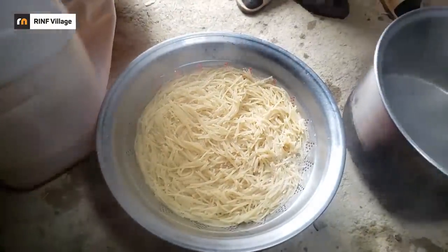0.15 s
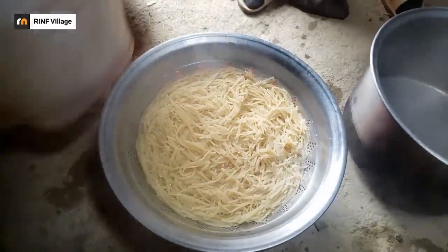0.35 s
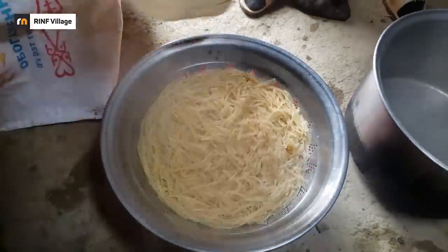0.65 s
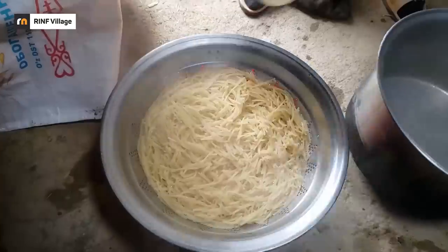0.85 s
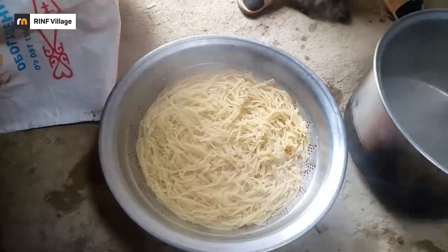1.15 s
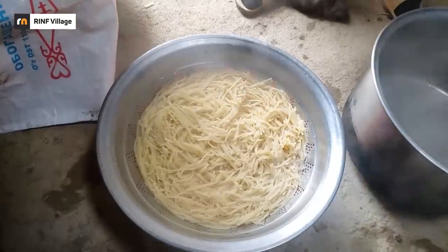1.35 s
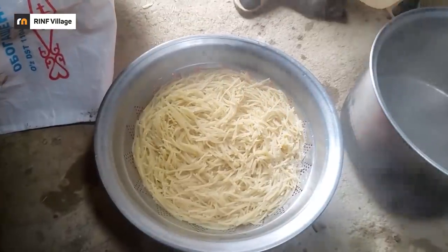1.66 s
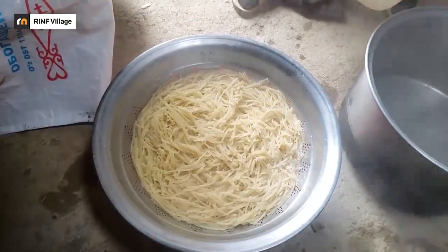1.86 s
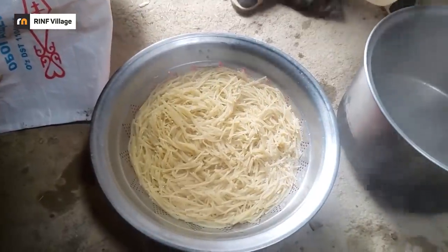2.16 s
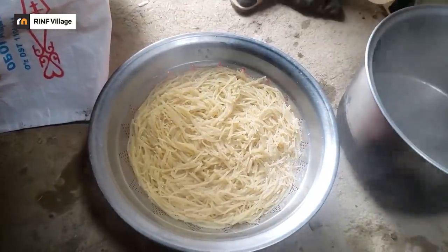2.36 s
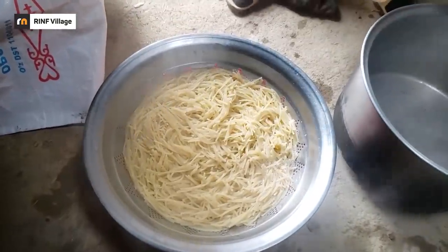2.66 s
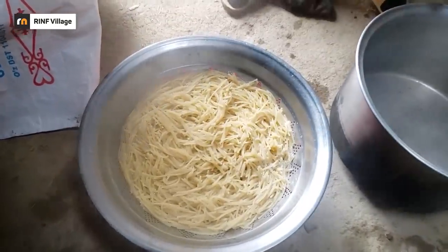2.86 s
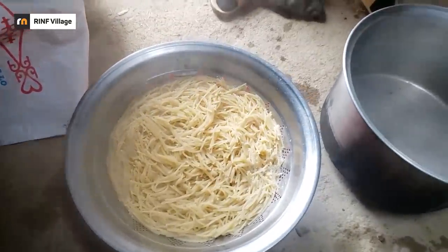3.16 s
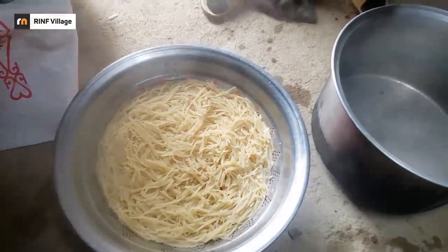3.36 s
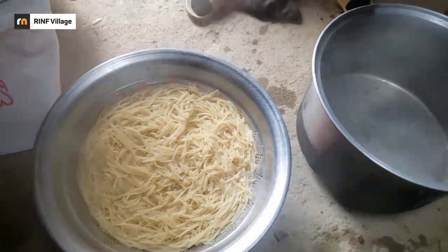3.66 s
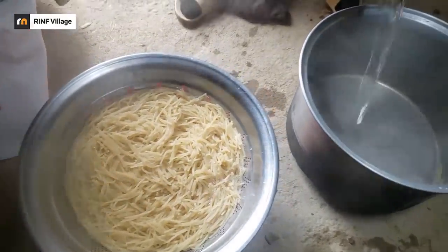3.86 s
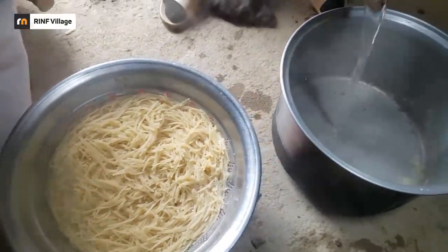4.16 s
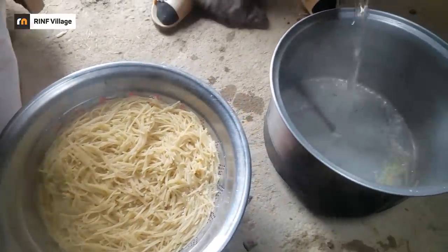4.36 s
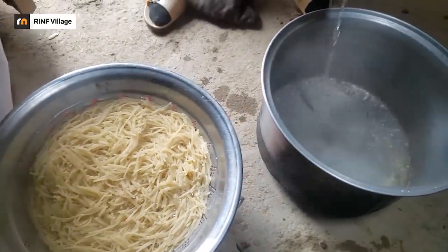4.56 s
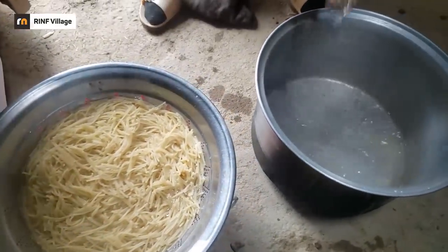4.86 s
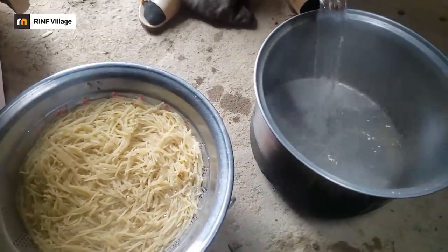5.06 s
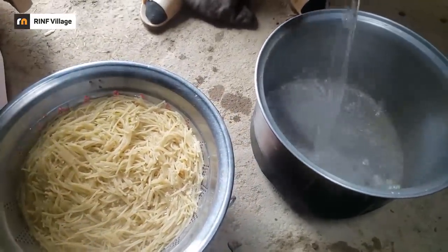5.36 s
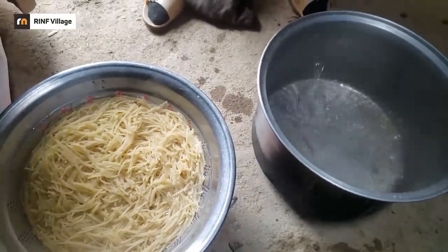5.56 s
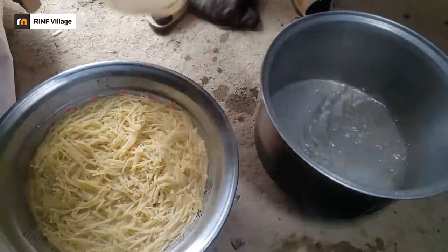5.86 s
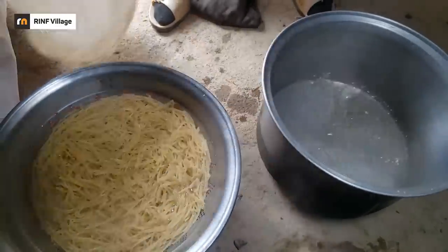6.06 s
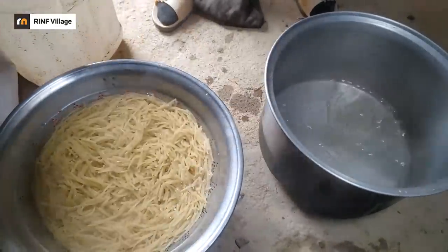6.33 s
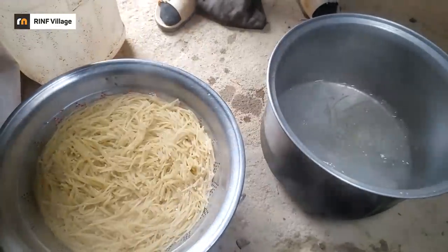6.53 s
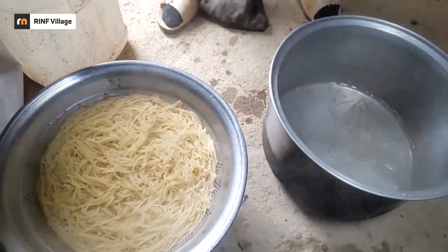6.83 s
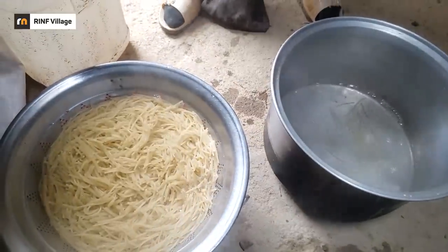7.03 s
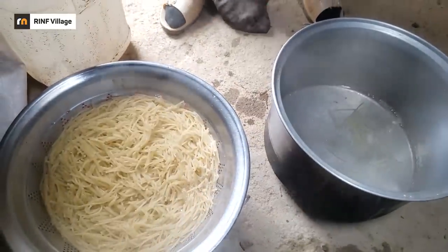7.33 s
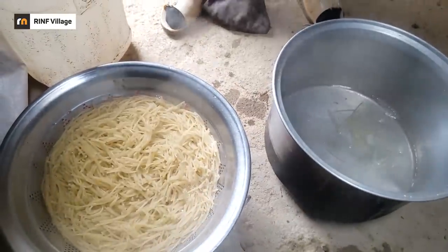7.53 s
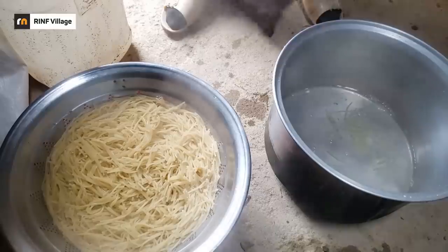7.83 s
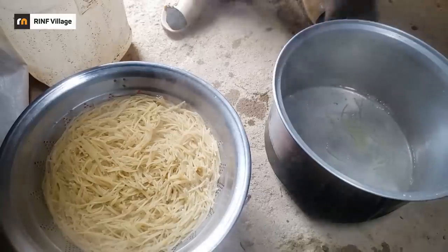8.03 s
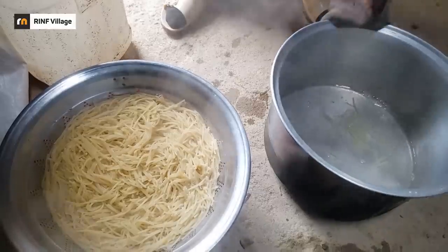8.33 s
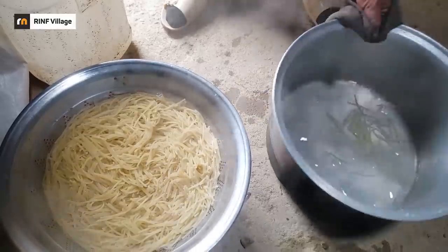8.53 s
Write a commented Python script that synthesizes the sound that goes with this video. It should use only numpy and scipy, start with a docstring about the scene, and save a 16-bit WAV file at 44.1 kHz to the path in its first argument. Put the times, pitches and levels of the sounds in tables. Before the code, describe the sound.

In an open kitchen, a hand-held microphone catches a quick run of knocks as a plastic jug hits a metal pot, followed by light scrapes and crisp plastic snaps. After a lull, two gushes of water spatter and gurgle into a deep, softly ringing pot. The jug cracks loudly, lands with a heavy thud and clicks again, leaving quiet air with faint bird chirps.

```python
"""In an open kitchen a stiff plastic water jug is moved about beside metal pots. Its impacts excite their
modes, its wall snaps, and friction makes it scrape. Water is poured into a deep pot in two gushes, with
spray, resonating bubbles and a ringing vessel, and the jug is set down with a thud. Small birds chirp
outside, and faint tones hang in the quiet. Floor and hands rumble softly in a hand-held recorder
whose two unlike microphone ports colour the sound."""
import sys
import numpy as np
from scipy import signal
from scipy.fft import rfft, irfft, next_fast_len
from scipy.io import wavfile
from scipy.ndimage import uniform_filter1d, map_coordinates

SR = 44100
rng = np.random.default_rng(int(sys.argv[2]) if len(sys.argv) > 2 else 0)


def wav_out(sig):
    """Save sig, one row per channel (or a flat mono array), as 16-bit PCM at SR to the path in sys.argv[1]."""
    wavfile.write(sys.argv[1], SR, np.round(np.clip(np.atleast_2d(sig).T, -1, 1) * 32767).astype(np.int16))


N = 383229
TIME, EVENT_TIME = np.arange(N) / SR, np.arange(SR // 2) / SR  # seconds: the scene, one decay

# Impacts of jug on pot. Each row: start in seconds, level in dB, relative slap level in dB.
KNOCKS = [(0.009, -29, -63), (0.046, -41, -29.5), (0.074, -25, -19.5), (0.2085, -24, -11.5),
          (0.245, -32, -29), (0.308, -28.5, -9.5), (0.329, -32.5, -13.5), (0.482, -44.5, 0),
          (0.62, -43.5, -1), (0.703, -61, 16.5), (0.756, -43.5, -8), (0.805, -30.5, -11.5),
          (0.93, -32, -15), (0.986, -37.5, -21), (1.11, -48.5, -9), (1.14, -47.5, -38), (1.17, -48, -6),
          (1.2, -42.5, -21), (1.253, -43.5, -36), (2.531, -62, -6), (2.588, -51.5, -2.5), (6.414, -61, -19),
          (6.457, -46.5, -15), (8.557, -55, -15)]
# Modes of the struck pot. Each row: frequency in Hz, level in dB, 60 dB decay time (T60) in seconds.
POT_MODES = [(510, -4, 0.18), (600, -2, 0.073), (683.6, 5, 0.21), (773.7, 3, 0.16), (827, -6, 0.2),
             (982, -11, 0.27), (1182, -4.5, 0.091), (1270, -8.5, 0.092), (1396, -7, 0.092),
             (1630, -8.5, 0.15), (1920, -11.5, 0.12), (2170, -13.5, 0.13)]
# Spectrum of the dull part of a contact. Each row: frequency in Hz, level in dB.
BODY_SPECTRUM = [(88, -20), (150, 0.5), (596, 0), (3270, -12.5), (4250, -17.5), (6500, -21.5),
                 (11000, -120)]
# The stream, one list per gush. Each row: time in seconds, level in dB.
GUSHES = [
    [(4.52, -65.5), (4.56, -58), (4.69, -51.5), (5.04, -50.5), (5.31, -82)],
    [(5.52, -61), (5.58, -39.5), (5.7, -52), (5.92, -38), (6.02, -43.5), (6.065, -50.5), (6.14, -46.5),
     (6.2, -62.5)],
]
# Slugs of water landing. Each row: start in seconds, level in dB, T60 in seconds, relative levels
# of hollow plunge and pot ring in dB.
SPLASHES = [(4.289, -41.5, 0.5, 2, -21.5), (4.3702, -26.5, 0.32, -35, -44), (4.4123, -26, 0.12, -37.5, -52),
            (4.4622, -51.5, 0.17, 20.5, -19), (4.5371, -31, 0.106, 0, -15.5), (4.6268, -29.5, 0.31, 4, -33),
            (4.7166, -28, 0.14, 5.5, -27), (4.82, -30.5, 0.66, -20, -11), (4.9358, -36.5, 0.092, 5, -10.5),
            (5.0196, -32, 0.48, -30, -12), (5.4189, -32, 0.3, -8, -42.5), (5.457, -38, 0.4, -11, -40),
            (5.5367, -24.5, 0.57, -39, -60), (5.5702, -23.5, 0.25, -19.5, -18.5),
            (5.6295, -33.5, 0.12, 14.5, -31), (5.693, -24.5, 0.21, -5, -27), (5.782, -21.5, 0.16, 11, -25),
            (5.8938, -37, 0.48, 9.5, -5.5), (5.988, -38, 0.12, 0, -8.5)]


def knocks():
    """Modal vibration: each impact rings the pot at new strengths and pitches, over a dull slap."""
    ring, slap = np.zeros((2, N)), np.zeros(N)
    for start, db, slap_db in KNOCKS:
        for hz, mode_db, t60 in POT_MODES:
            envelope = decay(db + mode_db - 7 + rng.normal(0, 2), t60, 0.0005) * flutter(60)
            phase = 2 * np.pi * hz * rng.normal(1, .008) * EVENT_TIME
            port_phase = [[0], [rng.normal(0, 0.36)]]
            add(ring, start, envelope * np.sin(phase + port_phase))
        add(slap, start, decay(db + slap_db, 0.26, 0.00043))
    return ring + amp(-7) * echoes(ring[0], t60=0.17) + slap * noise(BODY_SPECTRUM, patchy_db=1.5)


def snaps():
    """Impulsive excitation: a crack, a fast rattle of wall and nearby surfaces, a longer dull decay."""
    # Each row: start in seconds, level in dB, relative rattle and body in dB, left over right in dB.
    events = [(1.4404, -33, -18, -6, -4), (1.567, -6, -16, -23.5, 3.5), (1.672, -16, -4.5, -22, -2.5),
              (2.0069, -39.5, -8.5, 3, 2), (2.148, -30.5, -16.5, -13, -3), (2.2998, -44, -25, 1.5, 0.5),
              (2.312, -33, -23, 0, -7.5), (2.3605, -43.5, -13, 1.5, -12), (2.4496, -12.5, -15, -29.5, -4),
              (2.6359, -7.5, -21.5, -32.5, 0.5), (2.71, -48, -11, 6, -6), (2.763, -20, -16.5, -6.5, 2),
              (3.121, -48.5, -1, 4, 2), (3.1503, -45, -7, -0.5, -4), (3.249, -47, -8, 3, -4),
              (5.0438, -16, -20, -67, -6), (6.0783, -29.5, -7.5, -4.5, 5), (6.11, -2, -16.5, -32, 1),
              (6.259, -44.5, -3, -17.5, -2.5), (6.364, -51.5, -9, -9.5, 10), (6.459, -47, -18, -7, -22),
              (6.5186, -36.5, -9.5, -10, 16), (6.94, -25.5, -12, -30, 3.5), (7.1529, -5, -19, -32.5, -3),
              (7.288, -39, -18, -29, -1.5), (7.3114, -43, -13.5, -23, -5), (8.2695, -54, -16.5, -36, -20.5)]
    # Each row: frequency in Hz, level in dB.
    bright_spectrum = [(350, -30.5), (600, -11), (1700, -4.5), (6980, 5.5), (8360, -9.5), (11000, 3),
                       (15000, -2.5), (15800, -5.5), (16500, -25.5)]
    pulse = np.hanning(11) * np.cos(2 * np.pi * 11500 * np.arange(-5, 6) / SR)
    crack, bright, dull = np.zeros((2, N)), np.zeros((2, N)), np.zeros(N)
    for start, db, rattle_db, body_db, pan_db in events:
        sides = amp([[pan_db / 2], [-pan_db / 2]])
        add(crack, start + .0008, amp([[db - 9], [db + 1]]) * sides * pulse)
        burst = decay(db - 10.5, 0.009, 0.000082)
        rattle = decay(db + rattle_db, 0.16, 0.0045)
        add(bright, start - .0003, (burst + rattle) * sides)
        add(dull, start - .001, decay(db + body_db - 1.5, 0.21, 0.0036))
        add(dull, start - .001, decay(db + body_db - 2.5, 0.025, 0.00074))
    bright *= noise(bright_spectrum, patchy_db=1.5)
    return crack + bright + dull * noise(BODY_SPECTRUM, patchy_db=2)


def pouring():
    """Air entrainment: the stream and its slugs hiss on impact and trap clouds of bubbles."""
    # Spectra of the spray and the hollow plunge. Each row: frequency in Hz, level in dB.
    spray_spectrum = [(210, -48), (350, -16), (784, -5), (906, -19), (1190, -16.5), (5090, 1),
                      (7990, -14.5), (15200, -12.5), (16500, -43.5)]
    plunge_spectrum = [(400, -22), (800, -16.5), (1500, -12.5), (2500, 7), (4500, -12), (8000, -50.5)]
    spray, plunge = stream(-2.5), stream(-5)
    for start, db, t60, hollow_db, _ in SPLASHES:
        add(spray, start, decay(db - 13.5, 0.013, 0.00016) + decay(db - 14.5, t60, 0.00086))
        add(plunge, start, decay(db + hollow_db - 20, 0.82 * t60, 0.0016))
    span = SPLASHES[0][0], GUSHES[-1][-1][0]
    drops = (rng.random(N) < 35 / SR) * rng.exponential(1, N)  # about 35 stray drops a second
    spatter = 1 + signal.fftconvolve(drops, decay(0, .02, 0.0002))[:N]
    fizz = spatter * noise(spray_spectrum, patchy_db=3.2, frames=14)
    fizz += amp(-7) * bubbles(900, span, low_hz=1400, high_hz=5000)
    gurgle = noise(plunge_spectrum, patchy_db=5.5, frames=12)
    gurgle += amp(0.5) * bubbles(1200, span, low_hz=900, high_hz=3400)
    return spray * fizz + plunge * gurgle


def bubbles(count, span, low_hz, high_hz):
    """Bubble resonance: small air pockets of many sizes ring as damped sines of rising pitch."""
    when, pitch, strength, pan = rng.random((count, 4)).T
    hz = low_hz * (high_hz / low_hz) ** pitch[:, None]
    samples = np.arange(700)
    cycles = hz * samples / SR
    envelope = (1.03 - strength[:, None]) ** -.38 * np.exp(-cycles / 4) * (1 - np.exp(-cycles))
    wave = envelope * np.sin(2 * np.pi * cycles * (1 + 0.004 * cycles))
    starts = span[0] + when * (span[1] - span[0])
    at = (starts * SR).astype(int)[:, None] + samples
    cloud = np.array([np.bincount(at.ravel(), (wave * side[:, None]).ravel(), N)[:N]
                      for side in (1 - .6 * pan, .4 + .6 * pan)])
    return cloud / np.sqrt(np.mean(cloud[:, at.min():at.max()] ** 2))


def gulps():
    """Resonance of large single bubbles: pitch glides as the air pocket changes depth and size."""
    # Each row: start in seconds, initial and final frequency in Hz, level in dB, T60 in seconds.
    pockets = [(0.014, 373, 397, -21, 0.038), (0.246, 334, 428, -17.5, 0.049),
               (4.545, 504, 800, -32.5, 0.061), (4.649, 1540, 1600, -34, 0.039),
               (4.72, 1540, 1468, -35.5, 0.15), (4.92, 1170, 1200, -32, 0.035),
               (4.832, 1900, 2000, -31, .03), (4.933, 2450, 2610, -26.5, .04),
               (5.073, 1157, 1153, -44, 0.3), (5.581, 424, 490, -36.5, 0.12), (5.57, 990, 705, -32, 0.089),
               (5.603, 1350, 1480, -24, 0.025), (5.655, 1040, 1190, -27, 0.029),
               (5.723, 1140, 1360, -26.5, 0.042), (5.783, 1450, 1460, -29, .04),
               (6.022, 2550, 2660, -38, .02), (6.214, 1060, 1340, -36.5, 0.018),
               (6.224, 2630, 2670, -37, 0.014), (6.551, 1740, 1840, -34.5, 0.029),
               (6.962, 1270, 1260, -13.5, 0.015), (6.958, 2540, 2710, -19, 0.0084)]
    out = np.zeros(N)
    for start, start_hz, end_hz, db, t60 in pockets:
        hz = end_hz + (start_hz - end_hz) * np.exp(-4 * EVENT_TIME / t60)
        add(out, start, decay(db, t60, 0.0015) * flutter(160) * glide(hz))
    return out + amp(-6.5) * echoes(out, t60=0.1)


def filling_pot():
    """Forced and free vibration: water drives and strikes the pot; deeper water favours other modes."""
    # Each row: frequency in Hz, levels in the first and second gush in dB, T60 in seconds.
    modes = [(695, 0.5, -9.5, 0.38), (802, -5.5, -1.5, 0.36), (1184, -11.5, -7.5, 0.36),
             (1463, -13.5, -10.5, 0.15)]
    shallow = [(hz, db, t60) for hz, db, _, t60 in modes]
    deeper = [(hz, db, t60) for hz, _, db, t60 in modes]
    first_gush_end = GUSHES[0][-1][0]
    driven, struck = stream(-7), np.zeros(N)
    for start, db, _, _, ring_db in SPLASHES:
        add(driven, start, decay(db + ring_db - 6, 0.29, .004))
        for hz, mode_db, t60 in shallow if start < first_gush_end else deeper:
            scatter_db, detune = rng.normal(0, [4, .008])  # moving water weights and shifts each mode
            envelope = decay(db + ring_db + mode_db + scatter_db, t60, 0.0017) * flutter(40)
            add(struck, start, envelope * np.sin(2 * np.pi * hz * (1 + detune) * EVENT_TIME))
    force = rng.standard_normal((2, N)) + rng.standard_normal(N)  # partly common to both sides
    ring = np.where(TIME > first_gush_end, resonate(force, deeper), resonate(force, shallow))
    return driven * ring + struck


# Low modes of room and jug, in two groups. Each row: frequency in Hz, level in dB, T60 in seconds.
DEEP_MODES = [(70.7, -3.5, 0.67), (112.1, 10, .4)]
BOOM_MODES = [(144.8, 0.94, 0.74), (236.5, 0.0061, 0.43)]


def thuds():
    """Damped low modes: the jug lands on the ground with a heavy, soft blow."""
    # Each row: start in seconds, level in dB.
    landings = [(1.675, -51), (6.111, -40), (6.556, -36), (6.626, -25)]
    out = np.zeros(N)
    for start, db in landings:
        for hz, mode_db, t60 in DEEP_MODES + BOOM_MODES:
            envelope = decay(db + mode_db, 0.49 * t60, 0.012)
            add(out, start, envelope * np.sin(2 * np.pi * hz * EVENT_TIME))
    return out


def scraping():
    """Friction noise: rubbing gives a smooth hiss, a dull body noise and a faint ring of the pot."""
    # Each row: time of full level, hold and fade in seconds, then hiss, body and ring levels in dB.
    strokes = [(0.0, 0.0046, 0.52, -59.5, -46, -49), (0.565, 0.19, 0.1, -43.5, -57.5, -64.5),
               (1.133, 0.29, 0.33, -76, -64, -62), (1.458, 0.099, -1.75, -64.5, -76.5, -85),
               (2.04, 0.083, 0.08, -58.5, -100, -86), (2.144, 0.0018, -0.0363, -54.5, -45.5, -46.5),
               (2.35, 0.024, 0.67, -94, -74, -76), (3.151, 0.089, -0.27, -61, -58, -91),
               (3.419, 0.305, 0.6, -91, -69, -75.5), (6.27, 0.026, 0.62, -65.5, -75, -75.5),
               (6.47, 0.034, 0, -91, -81.5, -58), (6.529, 0.11, -0.33, -54, -50.5, -70),
               (6.659, 0.022, -0.1, -57.5, -50, -78), (6.738, 0.016, 1.02, -68.5, -65, -84),
               (7.299, 0.087, -0.7, -67.5, -83, -94.5), (8.461, 0.22, -0.49, -64, -91.5, -93),
               (8.58, 0.075, -0.41, -75, -63, -63)]
    # Each row: frequency in Hz, level in dB.
    hiss_spectrum = [(710, -28.5), (1200, 0.5), (5270, 8), (8360, -4.5), (11600, 1), (15100, -3.5),
                     (16500, -29)]
    hiss, body, ring = swells(strokes, rise_ratio=1)
    for start, db, _ in KNOCKS:  # each knock leaves a hollow rattle
        for layer, relative_db in (hiss, -34), (body, -30.5), (ring, -14.5):
            add(layer, start, decay(db + relative_db, 0.18, 0.002))
    return (hiss * noise(hiss_spectrum, patchy_db=.6) + body * noise(BODY_SPECTRUM, patchy_db=4.5)
            + ring * resonate(rng.standard_normal(N), POT_MODES))


def rumble():
    """Structure-borne sound: bumps of floor and hands excite low modes, nearly alike at both ports."""
    # Each row: time of full level, hold and fade in seconds, then deep and boom levels in dB.
    bumps = [(0.0, 0.087, 0.19, -39, -39.5), (0.3, 0.07, 0.27, -38, -46.5), (0.82, 0.083, 0.55, -44.5, -59),
             (1.45, 0.078, -1.5, -61, -57.5), (1.678, 0.0076, -0.01, -41, -45.5),
             (2.04, 0.014, 2.57, -60.5, -70), (2.64, 0.063, -0.3, -52, -82),
             (2.78, 0.089, -0.21, -45, -49.5), (3.151, 0.14, 0.6, -63, -65), (3.501, 0.03, 0.59, -80, -76),
             (4.4, 0.015, 0.82, -61, -61), (5.12, 0.17, -1.93, -60.5, -60.5),
             (5.409, 0.0073, 0.16, -54, -56.5), (6.11, 0.025, 0.5, -51, -51),
             (6.64, 0.044, 0.2171, -30, -43.5), (6.948, 0.026, -0.14, -52, -62.5),
             (7.7, 0.053, 0.57, -64.5, -66.5), (8.598, 0.059, 0.36, -51, -52)]
    # Each row: frequency in Hz, level in dB.
    deep_spectrum = [(15, -41), (25, -9.5), (59, 11.5), (115, -1.5), (150, -23.5), (180, -40.5),
                     (310, -120)]
    boom_spectrum = [(71, -29.5), (120, -12), (151, 4.5), (199, -4), (380, -5.5), (490, -38), (840, -120)]
    deep, boom = swells(bumps, rise_ratio=0.33) + amp([[-73.5], [-94.5]])  # a floor between bumps
    hum = lambda modes: amp(-8.5) * resonate(rng.standard_normal(N), modes)
    return (deep * unit(noise(deep_spectrum, patchy_db=1) + hum(DEEP_MODES))
            + boom * unit(noise(boom_spectrum, patchy_db=7) + hum(BOOM_MODES)))


def birds():
    """Frequency modulation: whistled glides from outside, smeared by the yard's echoes."""
    # Each row: start and length in seconds, initial and final frequency in Hz, level in dB.
    chirps = [(1.307, 0.022, 4130, 3900, -72), (3.535, 0.032, 4540, 3980, -67.5),
              (3.571, 0.025, 4210, 3640, -65.5), (3.582, 0.042, 5860, 3730, -65),
              (4.074, 0.048, 4160, 5600, -68.5), (4.113, 0.052, 5700, 2950, -67),
              (6.857, 0.04, 4440, 4260, -78), (7.06, 0.025, 4430, 4130, -67),
              (7.354, 0.058, 5400, 3650, -71), (7.84, 0.067, 4200, 5430, -67),
              (7.876, 0.066, 5350, 3250, -73), (7.948, 0.033, 4660, 4080, -68.5),
              (8.147, 0.037, 5260, 3680, -73), (8.349, 0.037, 2630, 3600, -68.5)]
    song = np.zeros(N)
    for start, length, start_hz, end_hz, db in chirps:
        hz = np.linspace(start_hz, end_hz, round(length * SR))
        hz += 600 * uniform_filter1d(rng.standard_normal(len(hz)), size=40)  # slight hoarseness
        add(song, start, amp(db) * signal.windows.tukey(len(hz), .6) * glide(hz))
    return song + amp(2.5) * echoes(song, t60=.5)


def faint_tones():
    """Narrow-band noise: thin wavering tones hang in the quiet stretches."""
    # Each row: start and end in seconds, frequency in Hz, level in dB.
    lines = [(3.361, 4.267, 743, -80.5), (3.389, 4.097, 1553, -83), (7.004, 7.85, 2692, -84)]
    out = np.zeros(N)
    for start, end, hz, db in lines:
        tone = resonate(rng.standard_normal(N), [(hz, 0, .25)])[:round((end - start) * SR)]
        add(out, start, amp(db) * signal.windows.tukey(len(tone), .3) * tone)
    return out


def outdoor_air():
    """Broadband ambient noise: the faint hush of the open air."""
    # Each row: frequency in Hz, level in dB.
    air_spectrum = [(150, -31), (250, -6.5), (947, -15.5), (1150, -17.5), (2670, -11.5), (6520, -13),
                    (7900, -25.5), (11500, -14.5), (15100, -24.5), (16500, -25.5)]
    return amp(-76) * noise(air_spectrum, patchy_db=3)


def amp(db):
    """Amplitude ratio of a level in dB."""
    return 10 ** (np.asarray(db) / 20)


def unit(x):
    """Normalisation to rms 1."""
    return x / np.sqrt(np.mean(x ** 2) + 1e-20)


def along(points, hz):
    """Interpolation of (Hz, value) points on a log frequency axis."""
    freqs, values = np.transpose(points)
    return np.interp(np.log(hz + 1), np.log(freqs + 1), values)


def add(track, start, sound):
    """Superposition of a sound on a track, from start seconds."""
    part = track[..., round(start * SR):][..., :sound.shape[-1]]
    part += sound[..., :part.shape[-1]]


def glide(hz):
    """A sine whose phase is the integral of its frequency."""
    return np.sin(2 * np.pi * np.cumsum(hz) / SR)


def decay(db, t60, rise):
    """Exponential decay of 60 dB in t60 seconds, after an onset with time constant rise."""
    return amp(db - 60 * EVENT_TIME / t60) * (1 - np.exp(-EVENT_TIME / rise))


def flutter(rate):
    """Random amplitude modulation around 1, with rate changes a second."""
    return amp(2 * map_coordinates(rng.standard_normal(int(rate) + 2), [EVENT_TIME * rate]))


def stream(gain_db):
    """Amplitude envelope of the two gushes, silent outside them."""
    return sum(amp(gain_db + np.interp(TIME, times, db, -200, -200))
               for times, db in map(np.transpose, GUSHES))


def swells(rows, rise_ratio):
    """One envelope per level column: each row swells, holds, then falls 20 dB per fade (0.02 s or more)."""
    full, held, fade, *levels = np.transpose(rows)
    t = np.arange(0, N + 64, 64)[:, None] / SR
    away = np.maximum(t - full - held, (full - t) / rise_ratio)
    shape_db = -20 * np.maximum(away, 0) / np.maximum(fade, .02)
    return [np.interp(TIME, t[:, 0], amp(db + shape_db).sum(1)) for db in levels]


def filtered(x, response):
    """Linear filtering: the spectrum of x times a frequency response."""
    size = next_fast_len(N + SR // 2)
    return irfft(rfft(x, size) * response(np.fft.rfftfreq(size, 1 / SR)), size)[..., :N]


def noise(spectrum, patchy_db, frames=6):
    """Partly coherent stereo noise of rms 1, with random gain patches in time and frequency."""
    # Each row: frequency in Hz, left-right correlation.
    coherence = [(60, 1), (180, 0.65), (550, 0.87), (1650, 0.048), (4970, 0.067), (15000, 0.26)]
    cells = signal.stft(rng.standard_normal((2, N)), nperseg=256)[2]
    patches = uniform_filter1d(rng.standard_normal(cells.shape[1:]), size=4, axis=0)
    patches = uniform_filter1d(patches, size=frames, axis=1)
    pair = signal.istft(cells * amp(patchy_db * unit(patches)), nperseg=256)[1][:, :N]

    def response(hz):
        angle = np.arccos(along(coherence, hz)) / 2
        return amp(along(spectrum, hz)) * [np.cos(angle), np.sin(angle)]
    mid, side = filtered(pair, response)
    return unit(np.array([mid + side, mid - side]))


def resonate(force, modes):
    """Forced response of damped modes of alternating sign, at rms 1."""
    def response(hz):
        total = 0
        for k, (mode_hz, db, t60) in enumerate(modes):
            damping = 1j * hz * np.log(1000) / (np.pi * t60)
            total += (-1) ** k * amp(db) * damping / (mode_hz ** 2 - hz ** 2 + damping)
        return total
    return unit(filtered(force, response))


def echoes(x, t60):
    """Reverberation: the diffuse answer of walls and yard, different at each port."""
    tail = decay(0, t60, 0.0072) * rng.standard_normal((2, SR // 2))
    return signal.fftconvolve(x[None], tail / np.linalg.norm(tail[0]), axes=1)[:, :N]


def scene():
    """Superposition of jug, water and background."""
    jug = knocks() + snaps() + thuds() + scraping() + rumble()
    water = filling_pot() + pouring() + gulps()
    return jug + water + birds() + faint_tones() + outdoor_air()


def record(dry):
    """Microphone response: the ports differ in colour and delay, and lose deep bass and top treble."""
    # Each row: frequency in Hz, left over right in dB.
    port_balance = [(60, 4), (270, 0.5), (740, 3.5), (2010, 7.5), (3330, 3), (5500, 5.5), (9080, -6),
                    (15000, -11.5)]
    bass_hz, top_hz, left_lag_s = 48, 15950, .0002
    sides = np.array([[.5], [-.5]])

    def response(hz):
        colour = amp(along(port_balance, hz) * sides)
        delay = np.exp(-2j * np.pi * hz * left_lag_s * sides)
        high_pass = 1 / (1 + (bass_hz / (hz + 1)) ** 4)
        low_pass = .5 - .5 * np.tanh((hz - top_hz) / 70)
        return colour * delay * high_pass * low_pass
    return filtered(dry, response)


dry = scene()
out = record(dry)
wav_out(out)
```